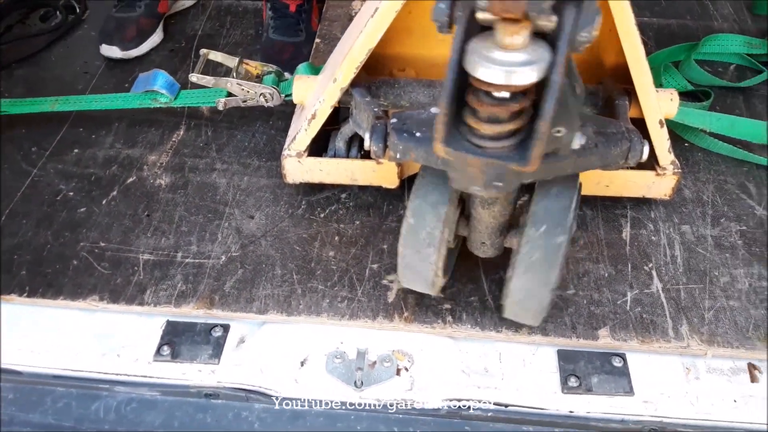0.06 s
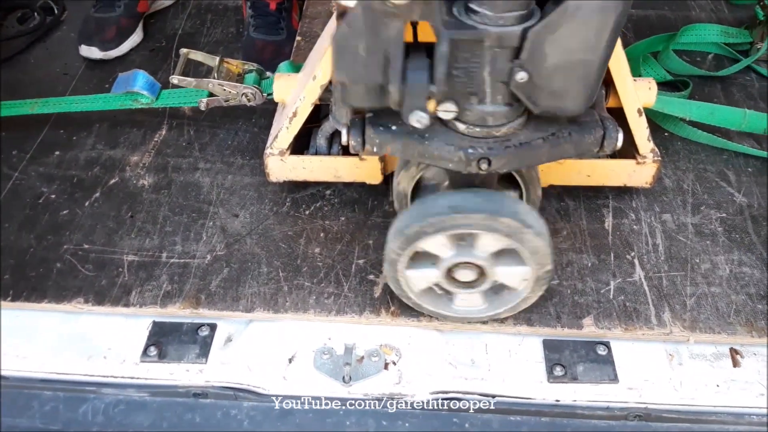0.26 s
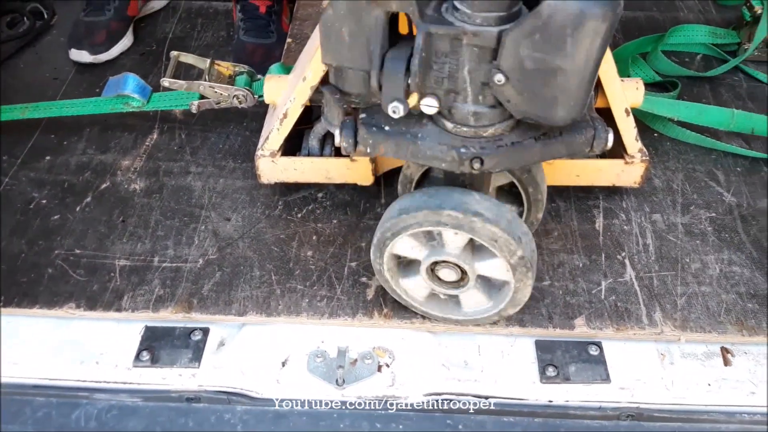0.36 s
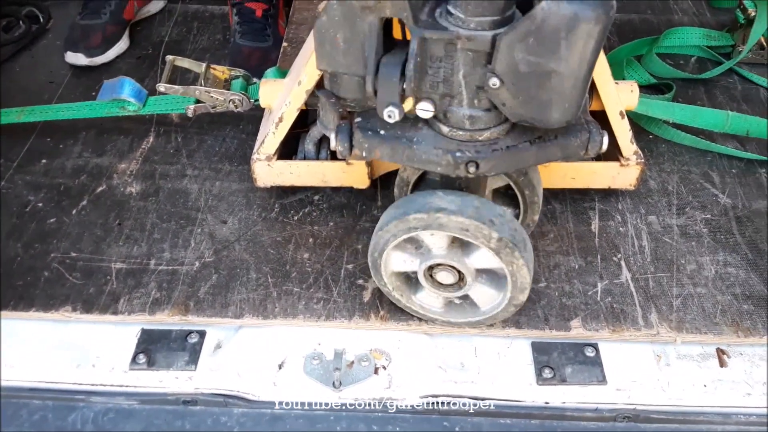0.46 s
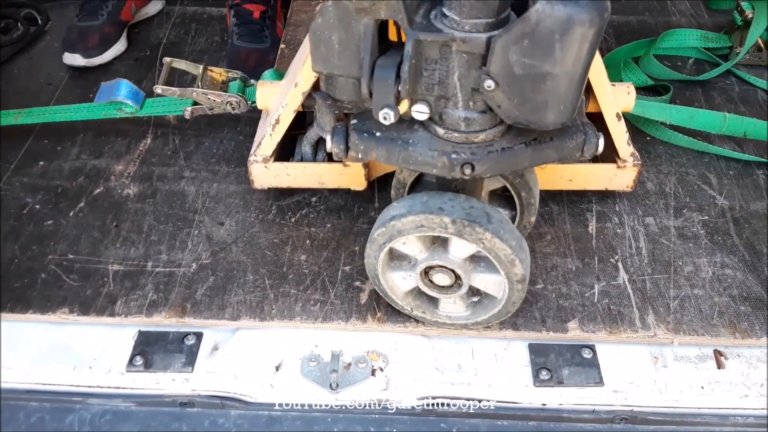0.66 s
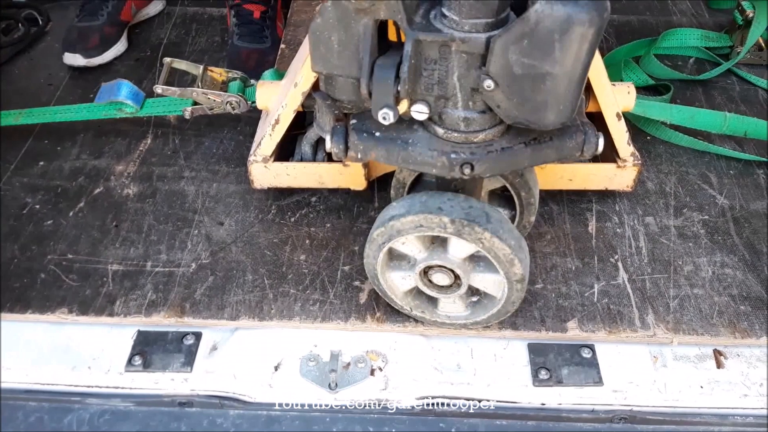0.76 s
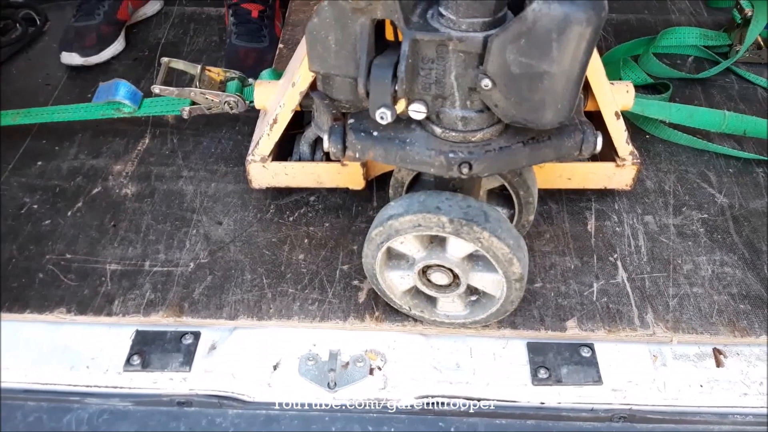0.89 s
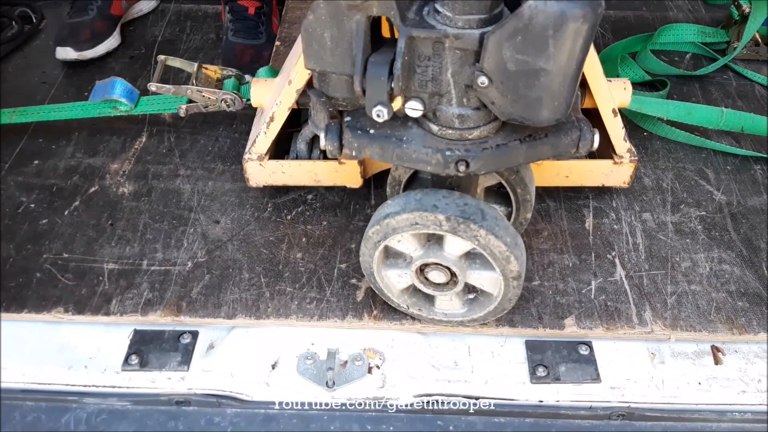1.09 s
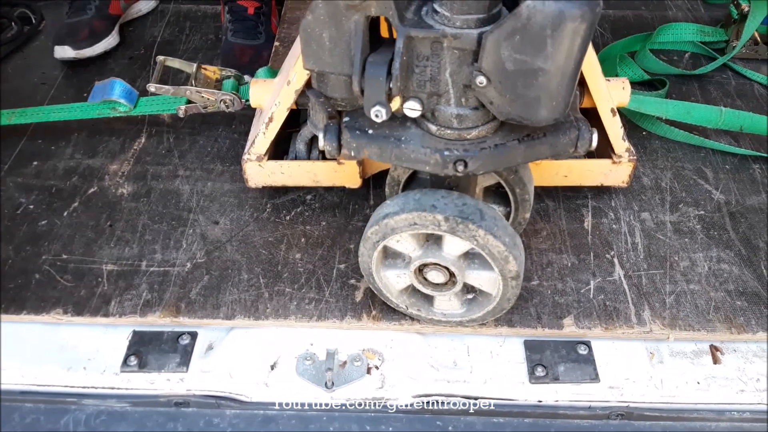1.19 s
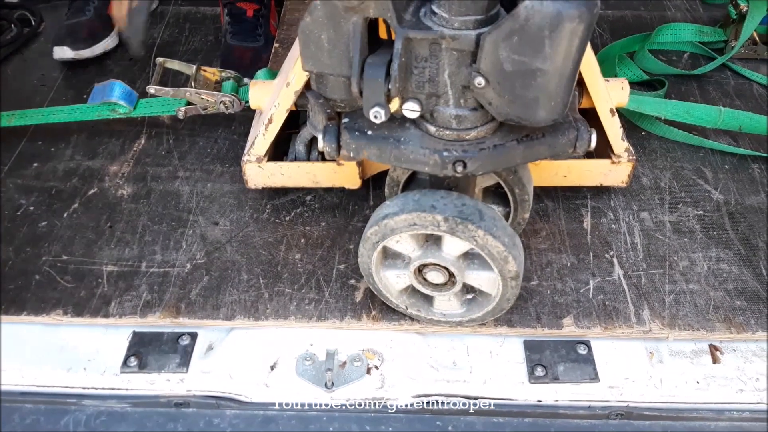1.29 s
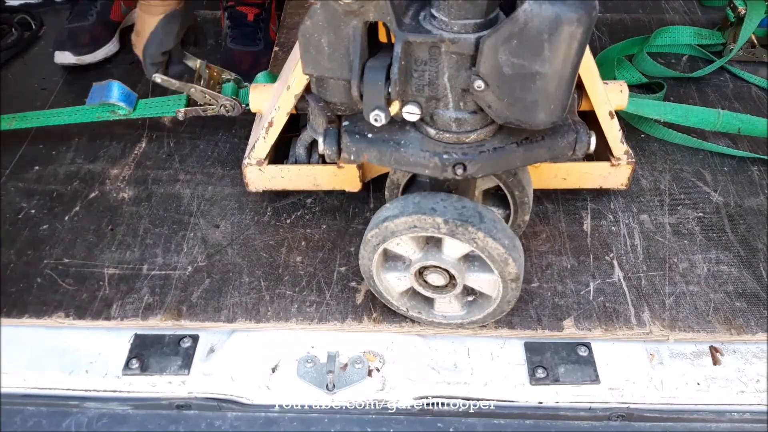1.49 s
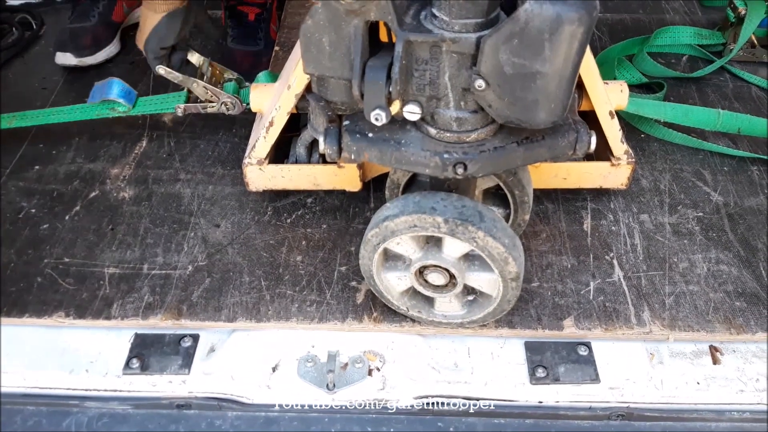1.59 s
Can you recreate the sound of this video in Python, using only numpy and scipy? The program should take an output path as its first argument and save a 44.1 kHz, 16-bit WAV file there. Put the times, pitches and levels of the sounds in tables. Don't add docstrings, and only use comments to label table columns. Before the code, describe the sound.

Loud steel clunk of a pallet truck's handle hitting its stop, then quiet and a ratchet clank

```python
import sys
import numpy as np
from scipy import signal
from scipy.fft import rfft, irfft
from scipy.io import wavfile
from scipy.ndimage import uniform_filter1d, minimum_filter1d

SR = 44100
rng = np.random.default_rng(int(sys.argv[2]) if len(sys.argv) > 2 else 0)


def dump_mix(stems):
    frames = np.atleast_2d(stems).T
    limited = np.clip(frames, -1, 1)
    pcm = np.round(limited * 32767).astype(np.int16)
    wavfile.write(sys.argv[1], SR, pcm)


def attenuation_scalar(level_db):
    decades = np.asarray(level_db, float) / 20
    return 10 ** decades


N = 72765
T = np.arange(N) / SR


def rms_one(x):
    return x / np.sqrt(np.mean(x ** 2) + 1e-20)


def slow(size):
    once = uniform_filter1d(rng.standard_normal(N), size=size)
    return rms_one(uniform_filter1d(once, size=size))


def split(x, hz):
    low = signal.sosfilt(signal.butter(2, hz, fs=SR, output="sos"), x)
    return low, x - low


def coloured(spectrum, size):
    hz = np.maximum(np.arange(size // 2 + 1) * SR / size, 10)
    points_hz, points_db = np.transpose(spectrum)
    level_db = np.interp(np.log(hz), np.log(points_hz), points_db)
    low_edge = np.minimum(1, hz / spectrum[0][0]) ** 2
    white = rfft(rng.standard_normal(size))
    return rms_one(irfft(white * attenuation_scalar(level_db) * low_edge, size))


def ring(clicks, hz, t60):
    r = attenuation_scalar(-60 / (max(t60, .002) * SR))
    w = 2 * np.pi * hz / SR
    return signal.lfilter([0, np.sin(w)], [1, -2 * r * np.cos(w), r * r], clicks + 1e-18)


def impulses(s, db):
    out = np.zeros(N)
    np.add.at(out, (np.asarray(s) * SR).astype(int), attenuation_scalar(np.asarray(db)))
    return out


def single_rings(rows):
    return sum(ring(impulses([s], [db]), hz, t60) for s, db, hz, t60 in rows)


def struck(hits, modes, colour, modes_db, crack_db, crack_t60, body_db, low_t60, high_t60, low_rise_s=0.0021):
    s, db = np.transpose(hits)
    tones = 0
    for hz, level_db, t60 in modes:
        strike_db = rng.normal(0, 2, len(s))
        beating = 1 + .45 * slow(size=400)
        tones = tones + ring(impulses(s, db + modes_db + level_db + strike_db), hz, t60) * beating

    t = T[:2 ** 15]
    rise = 1 - np.exp(-t / .0002)
    low, high = split(coloured(colour, size=len(t)), 2700)
    high, top = split(high, 6960)
    low = low * attenuation_scalar(-60 * t / low_t60) * (1 - np.exp(-t / low_rise_s))
    high = high * attenuation_scalar(-60 * t / high_t60)
    top = top * attenuation_scalar(-60 * t / (high_t60 * .75))
    body = signal.fftconvolve(impulses(s, db + body_db), (low + high + top) * rise)[:N]

    burst = attenuation_scalar(crack_db - 60 * t / crack_t60) * rise
    crack = signal.fftconvolve(impulses(s, db), burst)[:N] * coloured(colour, size=N + 1)[:N]
    return tones + crack + body


# (pitch [Hz], level [dB per Hz])
YARD = [(25, -22), (64, -10.5), (230, -2), (400, -17), (1150, -18), (2200, -29.5), (3600, -25.5),
        (9000, -39.5), (16000, -53)]


def yard():
    draws = [coloured(YARD, size=N + 1)[:N], coloured(YARD, size=N + 1)[:N]]
    out = split(draws[1], 500)[0]
    for k, hz in enumerate(500 * 2 ** np.arange(0, 5, .5)):
        sos = signal.butter(2, [hz, hz * np.sqrt(2)], "band", fs=SR, output="sos")
        band = signal.sosfilt(sos, draws[k % 2])
        flicker_db = 1.8 * slow(size=2000)
        fade_db = 13.5 * (hz > 1500) * (T - 1.0861)
        out = out + band * attenuation_scalar(flicker_db - fade_db)
    return attenuation_scalar(-64) * out


# (time [s], level [dB])
SCRUB = [
    (0, -44),
    (0.101, -50.5),
    (0.129, -30.5),
    (0.221, -33.5),
    (.33, -33.5),
    (.45, -32.5),
    (0.561, -51),
    (.7, -60.5),
]
# (pitch [Hz], level [dB per Hz])
SCRUB_COLOUR = [(18, -38), (30, -10.5), (215, -2), (937, -7), (1670, -10.5), (10500, -27), (12000, -34),
                (14800, -35), (16000, -62.5)]


def scrub():
    s, db = np.transpose(SCRUB)
    stop_db = -60 * np.maximum(T - s[-1], 0)
    lumps_db = 0.87 * slow(size=400)
    return attenuation_scalar(np.interp(T, s, db) + stop_db + lumps_db) * coloured(SCRUB_COLOUR, size=N + 1)[:N]


# (time [s], level [dB])
TICKS = [(.009, -38), (.0128, -17.5), (.0172, -14), (.0225, -21), (.0776, -13), (.0815, -24), (.0885, -28),
         (.109, -23.5), (.2153, -12.5), (.219, -21.5), (.2225, -22), (.2695, -16), (.276, -19.5),
         (.526, -30.5), (.535, -42.5), (1.1497, -57)]
# (pitch [Hz], level [dB], t60 [s])
TICK_MODES = [(4340, 0.5, 0.014), (5000, -4.5, 0.024), (5980, -6, .04), (6580, 1, .04), (7184, 0, 0.03),
              (7460, -7.5, 0.034), (9080, -3.5, 0.058), (11660, -2, 0.043)]
# (pitch [Hz], level [dB per Hz])
TICK_COLOUR = [(470, -46), (800, -21.5), (2870, -13.5), (4340, -0.5), (4680, -7), (6650, -1), (11600, -9),
               (16000, -17)]


def linkage_ticks():
    return struck(TICKS, TICK_MODES, TICK_COLOUR, modes_db=-17.5, crack_db=-10.5, crack_t60=0.008,
                  body_db=-16, low_t60=0.13, high_t60=0.18)


def yard_echo(x):
    band = signal.butter(1, [500, 6000], "band", fs=SR, output="sos")
    response = signal.sosfilt(band, rng.standard_normal(N)) * attenuation_scalar(-60 * T / 0.88)
    return attenuation_scalar(-47) * signal.fftconvolve(x, response / np.sqrt(np.sum(response ** 2)))[:N]


# (time [s], level [dB])
KNOCK_A = [
    (.1092, -17),
    (.112, -15.5),
    (.1145, -17),
    (.124, -18.5),
    (.138, -20.5),
    (.204, -28.5),
    (.333, -21.5),
    (.338, -24),
]
# (pitch [Hz], level [dB], t60 [s])
KNOCK_A_MODES = [(759, -5.5, 0.29), (1195, -9.5, .25), (1253, -6.5, 0.16), (1580, -7, 0.24), (1623, 3, .15),
                 (1800, -0.5, .06), (1960, 0, .1), (3130, -5.5, 0.2), (3305, -6.5, .16), (4470, -9, .12),
                 (4920, -4, .12), (5240, -2.5, .12), (5647, -13, .2), (6740, -16.5, 0.14)]
# (pitch [Hz], level [dB per Hz])
KNOCK_A_COLOUR = [(150, -10.5), (450, -3), (900, -8), (1700, 1), (3000, -8.5), (5000, -8), (10000, -34),
                  (16000, -38.5)]


def first_knock():
    return struck(KNOCK_A, KNOCK_A_MODES, KNOCK_A_COLOUR, modes_db=-24, crack_db=-10.0, crack_t60=0.045,
                  body_db=-15, low_t60=0.24, high_t60=0.3)


# (time [s], level [dB], pitch [Hz], t60 [s])
THUMPS = [(.113, -31.5, 560, 0.091), (.133, -19.5, 338, 0.027), (.145, -19, 247, 0.04),
          (.147, -25, 514, 0.13), (.155, -23.5, 243, 0.17), (.24, -27.5, 241.5, 0.26),
          (.33, -24.5, 410.6, 0.091), (.358, -2.5, 2838, 0.24), (.362, -4, 259.6, 0.21),
          (.3738, -5.5, 254.9, 0.27), (1.508, -53.5, 539, 0.065), (1.512, -52.5, 700, .08),
          (1.518, -51, 292, 0.071), (1.53, -46, 321, 0.13), (1.55, -49, 248, 0.12)]


def deck_thumps():
    return single_rings(THUMPS)


# (time [s], level [dB])
KNOCK_B = [
    (.2298, -15),
    (.233, -9),
    (.242, -12.5),
    (.258, -13.5),
]
# (pitch [Hz], level [dB], t60 [s])
KNOCK_B_MODES = [(666, -10.5, 0.14), (759, -10.5, 0.45), (837, -4.5, .3), (1217, -3.5, 0.4),
                 (1307.4, -7.5, 0.66), (1623, -7, 0.16), (1841, -7.5, .15), (2068, 3, 0.35),
                 (2140, -6.5, 0.25), (2750, -11, .35), (3060, -15.5, .35), (3693, -11.5, .2),
                 (11700, -24, .2), (13200, -32, .2)]
# (pitch [Hz], level [dB per Hz])
KNOCK_B_COLOUR = [(150, -14), (500, -3), (1200, 4), (2100, -6), (3500, -5), (5000, -17.5), (10000, -36),
                  (16000, -44)]


def second_knock():
    return struck(KNOCK_B, KNOCK_B_MODES, KNOCK_B_COLOUR, modes_db=-13.5, crack_db=-9.5, crack_t60=0.045,
                  body_db=-15.0, low_t60=0.099, high_t60=0.41)


# (time [s], level [dB], pitch [Hz], t60 [s])
CREAKS = [
    (.26, -37, 7650, .1),
    (.27, -31, 7550, .1),
    (1.119, -59.5, 3300, 0.015),
    (1.122, -58, 3600, 0.014),
    (1.1497, -53, 6090, .006),
]


def settling_creaks():
    return single_rings(CREAKS)


# (time [s], level [dB])
CLUNK = [
    (.3515, 8.5),
    (.357, 9.5),
    (.366, 11.5),
    (.381, 2.5),
    (.40, 4.5),
    (.412, 0),
    (.425, -4),
    (.445, -8),
]
# (pitch [Hz], level [dB], t60 [s])
CLUNK_MODES = [(539, -16, .3), (688, -10, .3), (761, -15, .22), (787.6, -14.5, 0.45), (852.6, -7.5, 0.4),
               (1211, -10, 0.35), (1357, -12.5, 0.39), (1442, -9, 0.19), (1510, -4, .3), (1539, -9, .2),
               (1716, 0, 0.22), (1878, -9, 0.22), (2022, -10, 0.24), (2294, -14, .36),
               (2477, -16.5, 0.21), (2724, -12, 0.27), (2857, -8, 0.16), (3064, -5.5, .29),
                (3310, -2, .18), (3470, -1, 0.18), (3707, -7, 0.17), (3710, -12, 0.2), (4068, -11, .25),
                (4400, -14, .18), (4600, -11.5, 0.16), (5050, -14, .2), (6430, -23.5, .4),
                (6993, -15.5, .14),
               (6750, -7, .06), (9520, -35, .38), (9723, -22, .22), (11150, -27, .2), (13200, -24, .17)]
# (pitch [Hz], level [dB per Hz])
CLUNK_COLOUR = [(260, -13.5), (430, -21), (650, -11), (1100, -12.5), (3000, -6), (7000, -16.5),
                (10000, -24.5), (15500, -39.5)]


def tiller_clunk():
    modes = CLUNK_MODES
    return struck(CLUNK, modes, CLUNK_COLOUR, modes_db=-19.5, crack_db=-14.5, crack_t60=0.087,
                  body_db=-16, low_t60=0.28, high_t60=0.29, low_rise_s=.012)


def chirp():
    start_s, length_s = 1.375, .09
    x = np.clip((T - start_s) / length_s, 0, 1)
    wobble = rms_one(uniform_filter1d(rng.standard_normal(N), size=150))
    hz = 3700 - 300 * x ** 2
    return attenuation_scalar(-76) * np.sin(np.pi * x) * wobble * np.sin(2 * np.pi * np.cumsum(hz) / SR)


# (time [s], level [dB])
RATCHET = [(1.478, -30), (1.4805, -29), (1.4915, -29), (1.4945, -30), (1.4982, -20), (1.5002, -17),
           (1.503, -23), (1.5098, -27), (1.515, -29), (1.519, -32), (1.526, -31), (1.5325, -35),
           (1.5402, -28), (1.551, -35), (1.559, -37), (1.576, -36)]
# (pitch [Hz], level [dB], t60 [s])
RATCHET_MODES = [(1400, -15.5, 0.14), (2130, -21.5, 0.22), (2304, -16, 0.27), (3254, -13.5, 0.27),
                 (3600, -6, 0.032), (3850, -9, 0.45), (3890, -6, 0.18), (3926, -4.5, 0.18),
                 (4060, -18, 0.1), (4468, -18, 0.19), (5432, -9, 0.1), (6500, -13, 0.11), (9000, 7, 0.023),
                 (9470, 0.5, 0.03)]
# (pitch [Hz], level [dB per Hz])
RATCHET_COLOUR = [(250, -9), (600, -7.5), (1000, -18.5), (2400, -7.5), (3900, 8), (5500, 0.5), (9200, -1),
                  (15500, -10.5)]


def strap_ratchet():
    return struck(RATCHET, RATCHET_MODES, RATCHET_COLOUR, modes_db=-23.5, crack_db=-7.5, crack_t60=0.014,
                  body_db=-24, low_t60=0.98, high_t60=0.44)


def scene():
    hits = linkage_ticks() + first_knock() + deck_thumps() + second_knock()
    hits = hits + settling_creaks() + tiller_clunk() + strap_ratchet()
    hits = signal.sosfilt(signal.butter(2, 125, "high", fs=SR, output="sos"), hits)
    return (yard() + scrub() + hits + yard_echo(hits) + chirp())[None]


def low_pass(x):
    return signal.sosfilt(signal.butter(12, 16330, fs=SR, output="sos"), x)


def record(dry):
    limit_db, release_db_per_s = -.2, 250
    ahead_s, smooth_s = .009, .004
    over_db = np.maximum(20 * np.log10(np.abs(dry[0]) + 1e-9) - limit_db, 0)
    recovery_db = release_db_per_s * T
    held = np.maximum.accumulate(over_db + recovery_db) - recovery_db
    half = int(ahead_s * SR / 2)
    ahead = -minimum_filter1d(-held, 2 * half + 1, origin=-half)
    limited = dry * attenuation_scalar(-uniform_filter1d(ahead, int(smooth_s * SR) + 1))
    mix = signal.sosfilt(signal.cheby2(12, 60, 16300, fs=SR, output="sos"), limited)
    return low_pass(mix)


dry = scene()
out = record(dry)
dump_mix(out)
```